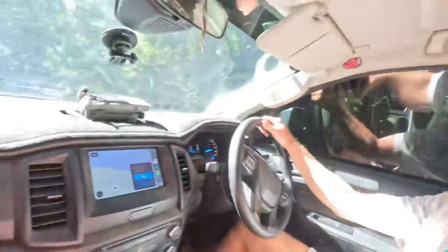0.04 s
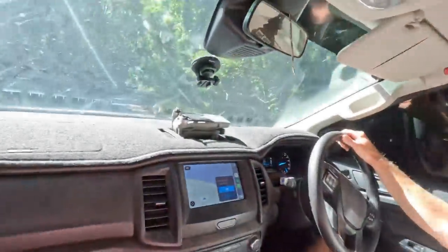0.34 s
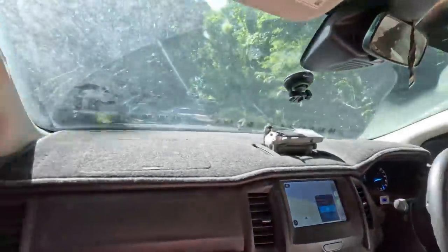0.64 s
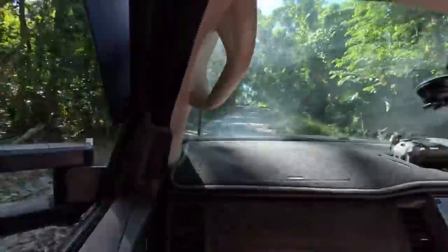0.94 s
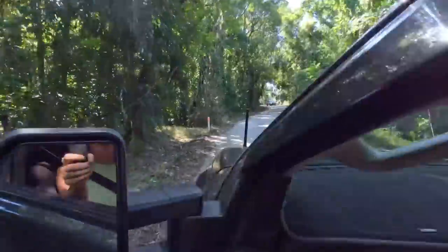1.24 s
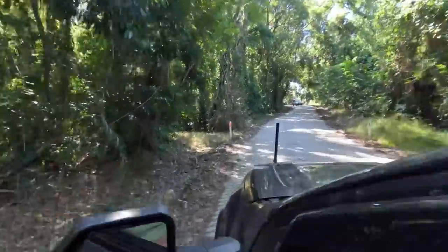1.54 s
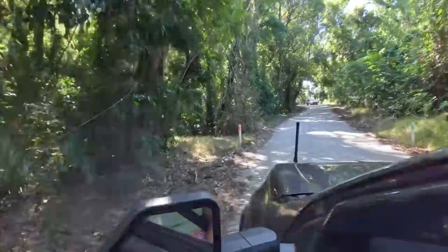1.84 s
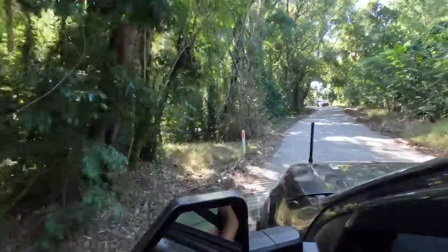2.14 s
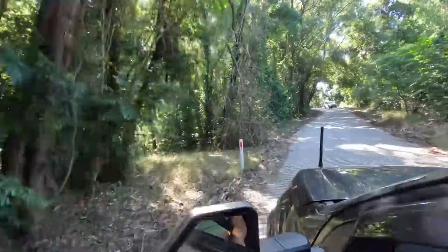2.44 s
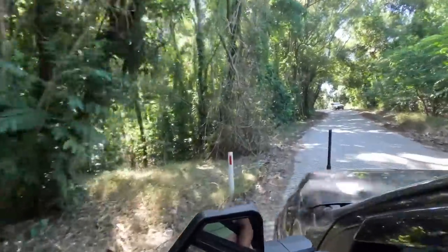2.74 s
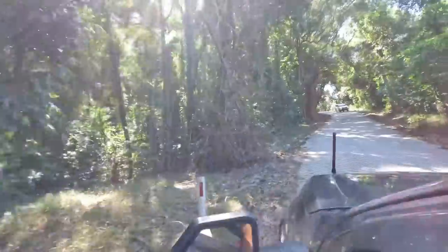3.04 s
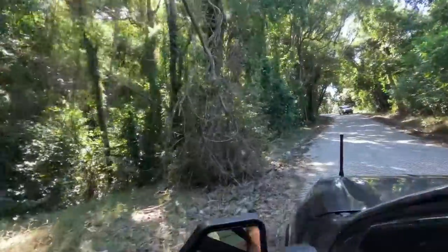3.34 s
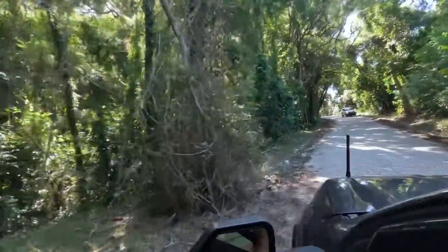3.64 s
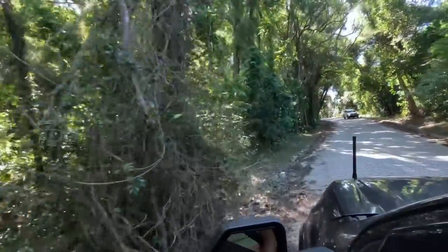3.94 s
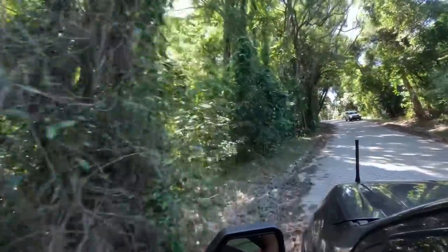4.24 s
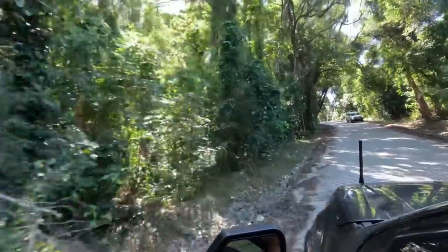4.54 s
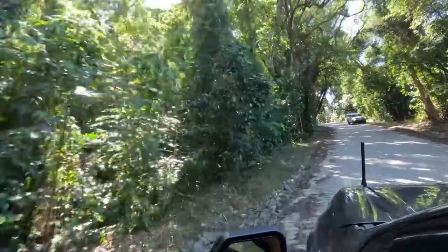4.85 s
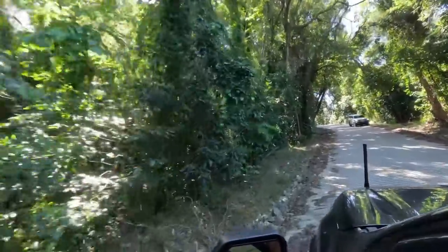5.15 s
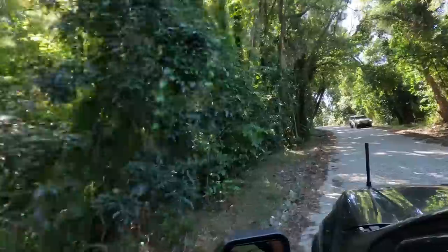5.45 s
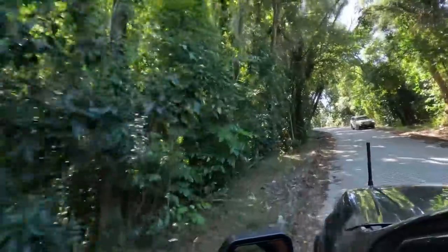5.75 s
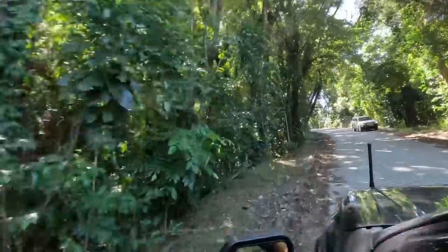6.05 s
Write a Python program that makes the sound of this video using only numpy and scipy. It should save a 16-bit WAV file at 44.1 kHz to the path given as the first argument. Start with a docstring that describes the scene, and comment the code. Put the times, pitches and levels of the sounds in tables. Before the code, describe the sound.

Wind batters a microphone held out of a moving vehicle's window. It starts briefly in the cabin, with a low engine drone and a deep pulsing of air, then the road noise rises and the wind hits. From there on, lumpy low gusts thump over a bright rush of air and tyres roaring on coarse tarmac, with the engine holding an even speed underneath.

```python
"""A four-wheel drive cruises along a forest road with a side window down.
First the cabin: the engine drones and the air booms, then throbs at the open window.
The road fades up, and after a second the microphone goes out through a burst of rushing air.
From there on wind buffets it, over the rush round mirror and pillar and the roar of the tyres,
which grows and takes on a hum near three seconds."""
import sys
import numpy as np
from scipy import signal
from scipy.fft import rfft, irfft
from scipy.io import wavfile
from scipy.ndimage import uniform_filter1d, minimum_filter1d

SR = 44100
rng = np.random.default_rng(int(sys.argv[2]) if len(sys.argv) > 2 else 0)


def generate_wav(sig):
    """Save sig (samples, or channels by samples) to the path in sys.argv[1] as 16-bit PCM at SR."""
    pcm = np.round(np.clip(np.atleast_2d(sig).T, -1, 1) * 32767).astype(np.int16)
    wavfile.write(sys.argv[1], SR, pcm)


N = 273861
TIME = np.arange(N) / SR
FREQS = np.maximum(np.fft.rfftfreq(N, 1 / SR), 1)
# the microphone's cues: it nears the window, meets the wind at the frame, is clear of the car
NEAR_WINDOW_S, AT_FRAME_S, CLEAR_S = 0.37, 0.88, 1.31


def from_db(db):
    """Decibels to gain."""
    return 10 ** (np.asarray(db) / 20)


def automation(rows):
    """One lane for each column after t/s, with a value at every sample."""
    times, *columns = np.transpose(rows)
    return [np.interp(TIME, times, column) for column in columns]


def ramp(start_s, end_s):
    """A straight fade from 0 to 1."""
    return np.clip((TIME - start_s) / (end_s - start_s), 0, 1)


def swell(at_s, spread_s):
    """A bell-shaped rise and fall of height 1."""
    return np.exp(-.5 * ((TIME - at_s) / spread_s) ** 2)


def shaped(gain):
    """Noise at unit rms, shaped by a gain at each frequency."""
    real, imaginary = rng.standard_normal((2, len(FREQS)))
    noise = irfft((real + 1j * imaginary) * gain, N)
    return noise / np.sqrt(np.mean(noise ** 2) + 1e-20)


def coloured(eq):
    """Unit noise through an EQ curve (f/Hz, level/dB) that falls steeply beyond its ends."""
    hz, db = np.transpose(eq)
    skirts = np.minimum(1, np.minimum(FREQS / hz[0], hz[-1] / FREQS)) ** 6
    return shaped(from_db(np.interp(np.log(FREQS), np.log(hz), db)) * skirts)


def drift(rate_hz):
    """A smooth random modulator at unit rms."""
    return shaped(1 / (1 + (FREQS / rate_hz) ** 2))


def levelled(noise, span_s):
    """Ride a noise to unit level over spans of this length."""
    size = int(span_s * SR)
    power = uniform_filter1d(uniform_filter1d(noise * noise, size), size)
    return noise / np.sqrt(power + 1e-9)


def resonance(hz, width_hz, level_db):
    """A resonance kept ringing by random forcing."""
    band = shaped(1 / (1 + ((FREQS - hz) / width_hz * 0.79) ** 2))
    return from_db(level_db) * levelled(band, span_s=0.39)


def thin_high_hiss(start_s=0.73, peak_s=1.36, end_s=1.41, level_db=-61, centre_hz=8800, width_hz=3900):
    """A faint, thin, bright hiss swells and then stops quickly."""
    envelope = np.interp(TIME, [start_s, peak_s, end_s], [0, 1, 0]) ** 1.4
    hiss = shaped(np.exp(-.5 * ((FREQS - centre_hz) / width_hz) ** 2))
    return from_db(level_db) * envelope * hiss


# rate of the engine cycle (two crank turns, five firings): t/s, f/Hz
ENGINE_SPEED = [(0, 20.06), (1.3, 20.12), (1.8, 19.72), (3, 19.54), (5, 19.15), (6.21, 19.5)]
# partials of the drone: multiple of the cycle rate, cabin level/dB, outside level/dB
ENGINE_ORDERS = [(4, -35.5, -32.5), (5, -33, -36), (9, -39.5, -47), (10, -37, -33.5), (11, -42.5, -45),
                 (12, -45.5, -45), (14, -42.5, -48.5), (15, -45.5, -37.5), (17, -47.5, -40),
                 (20, -56, -40.5), (22, -52, -45.5), (27, -52.5, -39.5), (39, -55, -43.5), (42, -55, -44.5),
                 (55, -73, -49.5)]
# partials of the drive's faint whine: multiple of the cycle rate, level/dB with the fader at 0
WHINE_ORDERS = [(64, -44.5), (80, -44)]
# fader ride on the whine: t/s, level/dB
WHINE_FADER = [(.7, -29), (1.25, -5), (1.8, -10), (2.4, 1.5), (3.1, -10), (3.6, -3), (6.21, -18)]


def engine(inside, wobble=0.00292, waver_inside=0.23, waver_outside=0.29, waver_whine=0.54):
    """No two firings are alike, so each partial wavers; the cabin muffles the drone's high ones."""
    cycle_hz, = automation(ENGINE_SPEED)
    whine_db, = automation(WHINE_FADER)
    phase = 2 * np.pi * np.cumsum(cycle_hz * (1 + wobble * drift(rate_hz=3.15))) / SR
    waver_drone = inside * waver_inside + (1 - inside) * waver_outside

    def partial(order, waver):
        """One wavering harmonic of the cycle at about unit rms."""
        level = 1 + waver * drift(rate_hz=5.0)
        return level * np.sqrt(2) * np.sin(order * phase + rng.uniform(0, 2 * np.pi))

    drone = 0
    for order, inside_db, outside_db in ENGINE_ORDERS:
        gain = inside * from_db(inside_db) + (1 - inside) * from_db(outside_db)
        drone += gain * partial(order, waver_drone)
    whine = sum(from_db(db + whine_db) * partial(order, waver_whine) for order, db in WHINE_ORDERS)
    return drone + whine


# EQ of the cabin bed: f/Hz, level/dB
CABIN_EQ = [(55, 2.5), (130, -2.5), (250, -5.5), (310, -9), (400, -14.5), (600, -19.5), (770, -17),
            (850, -23), (910, -25.5), (1200, -25.5), (1800, -32.5), (2150, -33.5), (2450, -33.5),
            (2750, -39), (3300, -36), (3600, -41.5), (4000, -44), (6000, -47.5), (8000, -50.5), (8800, -58),
            (9600, -54.5), (11000, -64.5), (12900, -63), (14000, -70)]


def cabin_bed(level_db=-29.5):
    """Muffled road rumble and air leaking into the cabin."""
    return from_db(level_db) * coloured(CABIN_EQ)


def cabin_boom(boom_hz=37.6, sag_hz_per_s=1.39, fade_db_per_s=71, throb_hz=29.02):
    """The cabin air booms, throbs against the open window as it dies, and swells once more."""
    def held(level_db, until_s):
        """Hold a level, then die away."""
        return from_db(level_db - fade_db_per_s * np.maximum(TIME - until_s, 0))

    phase = 2 * np.pi * np.cumsum(boom_hz - sag_hz_per_s * TIME) / SR
    last_swell = from_db(-19) * swell(at_s=1.2, spread_s=0.11)
    boom = (held(-16.5, until_s=0.51) + last_swell) * np.sin(phase)
    sub_octave = held(-20.5, until_s=1) * np.sin(phase / 2)   # every other beat is stronger
    throb = from_db(-15.5) * swell(at_s=0.71, spread_s=0.11) * np.sin(2 * np.pi * throb_hz * TIME)
    return np.sqrt(2) * (boom + sub_octave + throb)


def body_boom():
    """The car's body booms, a sub layer heard outside."""
    return resonance(hz=32, width_hz=8.7, level_db=-33)


# fader rides on the air past mirror and pillar: t/s, rush level/dB, hiss level/dB
AIRFLOW_FADERS = [(1.66, -38.5, -50), (1.95, -36, -49), (2.1, -35.5, -45.5), (2.22, -34, -46.5),
                  (2.45, -32, -44), (2.62, -34, -45.5), (2.7, -35.5, -44.5), (3.0, -34.5, -44.5),
                  (3.25, -33, -44), (3.7, -34, -48), (4.1, -36, -48), (4.3, -35, -47), (4.58, -36, -46),
                  (4.66, -33.5, -45), (4.8, -35, -46), (5.25, -34.5, -46.7), (5.7, -33.5, -44.5),
                  (6.21, -33, -45)]
# EQs of the rush and of the fine hiss above it: f/Hz, level/dB
RUSH_EQ = [(900, -13), (1400, -2), (1900, 0.5), (2400, -1), (2850, -3), (3300, -2), (3600, -9.5),
           (4200, -17.5), (5000, -41)]
HISS_EQ = [(3000, -2), (3750, 1), (4400, -1.5), (5600, -5.5), (6900, -12), (8200, -14.5), (9000, -20.5),
           (10000, -20), (11500, -28), (12300, -33), (14500, -44)]


def slipstream(flutter_db=0.91, flutter_hz=22, shear_hiss_db=-18):
    """Air tears past mirror and pillar, hardest in the shear layer; rush and hiss flutter together."""
    rush_db, hiss_db = automation(AIRFLOW_FADERS)
    shear = from_db(-33) * swell(at_s=1.422, spread_s=0.077)   # fast air by the window, crossed once
    rush_gain = np.hypot(from_db(rush_db), shear)
    hiss_gain = np.hypot(from_db(hiss_db), shear * from_db(shear_hiss_db))
    rush = coloured(RUSH_EQ)
    whistle = resonance(hz=3270, width_hz=170, level_db=-12.8)
    air = rush_gain * (rush + whistle) + hiss_gain * opening_shelf(coloured(HISS_EQ))
    return air * from_db(flutter_db * drift(flutter_hz))


def opening_shelf(hiss, above_hz=7500, start_db=-5, rise_db_per_s=1.17):
    """A high shelf steadily brightens the hiss."""
    top = irfft(rfft(hiss) / (1 + (above_hz / FREQS) ** 6), N)
    return hiss + (from_db(start_db + rise_db_per_s * TIME) - 1) * top


# EQ of the tyre roar: f/Hz, level/dB
TYRE_EQ = [(250, -27), (500, -2), (700, 2), (810, -6), (900, -4), (1080, -2.5), (1380, -9), (1600, -7.5),
           (2000, -20.5), (3000, -37)]
# narrow bands humming in it: f/Hz, width/Hz, level/dB against the roar
TYRE_HUM = [(314, 83, -11.5), (804, 10, -10.5), (839, 12, -14), (1073, 10.5, -12), (1227, 31, -15),
            (1600, 20, -21.5)]


def tyres(swirl, settled_db=-26.5, beside_door_db=-10.5, settle_s=1.31, flutter_db=0.5):
    """Tread roars on coarse tarmac, fluttering in the air; it grows and hums as the microphone reaches out."""
    level_db = settled_db + beside_door_db * np.exp(-np.maximum(TIME - CLEAR_S, 0) / settle_s)
    roar = from_db(flutter_db * swirl) * coloured(TYRE_EQ)
    hum = ramp(start_s=2.7, end_s=3.0) * sum(resonance(*band) for band in TYRE_HUM)
    late_drone = resonance(hz=347, width_hz=170, level_db=-23) * swell(at_s=5.82, spread_s=0.27)
    return from_db(level_db) * (roar + hum) + late_drone


# fader ride on the wind, steady but for a few lulls: t/s, level/dB
WIND_FADER = [(1.25, -23.5), (1.32, -20), (1.45, -18.5), (1.7, -22), (1.98, -20), (2.07, -22.5),
              (2.2, -18.5), (2.95, -20), (3.1, -23.5), (3.42, -20), (3.58, -20.5), (3.64, -18.5),
              (4.15, -20), (4.6, -17.5), (5.3, -20), (5.55, -21.5), (5.8, -21), (6.0, -19)]
# EQ of its rumble: f/Hz, level/dB
WIND_EQ = [(18, 5), (45, 7.5), (62, 3.5), (80, -2), (115, -0.5), (200, -4.5), (310, -3), (480, -9.5),
           (750, -17), (1100, -24)]


def wind(swirl, flutter_db=1.1):
    """Turbulence presses on the microphone port: a deep, lumpy rumble."""
    level_db, = automation(WIND_FADER)
    return from_db(level_db + flutter_db * swirl) * levelled(coloured(WIND_EQ), span_s=0.079)


# cue list of the big gusts: t/s, thump level/dB, roar level/dB, push level/dB, spread/s
GUST_CUES = [(1.329, -15.5, -30, -30, 0.016), (1.38, -14.5, -29, -22, 0.014), (1.579, -21, -43, -26, 0.014),
             (1.693, -18, -42, -30, 0.02), (1.738, -33, -26, -30, 0.016), (1.784, -14, -30, -27, 0.012),
             (1.834, -19.5, -26, -30, 0.016), (1.911, -16, -38, -22, 0.0054),
             (1.944, -16, -37, -30, 0.0079), (1.989, -16.5, -45, -23, 0.013), (2.028, -23, -27, -32, 0.006),
             (2.22, -20, -33, -28, 0.028), (2.306, -16.5, -30, -32, 0.014),
             (2.377, -21.5, -27.5, -29, 0.035), (2.574, -19.5, -24.5, -32, 0.01),
             (2.632, -20, -32, -26, 0.013), (2.803, -18, -33, -12, 0.012), (2.986, -14, -42, -32, 0.015),
             (3.378, -19.5, -35, -28, 0.017), (3.438, -22, -33, -26, 0.013),
             (3.525, -8.5, -26, -2.9, 0.0075), (3.92, -13, -31, -12, 0.014),
             (3.976, -14.5, -30, -11.5, 0.01), (4.021, -20, -35, -24, 0.0088),
             (4.064, -15.5, -38, -26, 0.024), (4.397, -18, -44, -13, 0.015), (4.444, -24, -38, -26, 0.012),
             (5.257, -13, -32, -17, 0.0085)]
# EQs of a gust's low thump and mid-range roar: f/Hz, level/dB
THUMP_EQ = [(30, 1), (80, 4.5), (250, 0), (450, -6.5), (900, -24.5), (1800, -32)]
ROAR_EQ = [(450, -3), (750, 6.5), (1150, -2.5), (1700, -14)]


def gusts(push_lag_s=0.019):
    """Each large gust thumps and roars, then its slow pressure shoves the diaphragm."""
    thump_gain = roar_gain = push = 0
    for at_s, thump_db, roar_db, push_db, spread_s in GUST_CUES:
        hit = swell(at_s, spread_s)
        thump_gain += from_db(thump_db) * hit
        roar_gain += from_db(roar_db) * hit
        push += from_db(push_db) * swell(at_s + push_lag_s, spread_s)
    thumps = thump_gain * levelled(coloured(THUMP_EQ), span_s=0.012)
    return thumps + roar_gain * coloured(ROAR_EQ) + push


def scene(tyre_shield_db=-6.5, air_shield_db=-15.5):
    """The mix follows the microphone: the road fades up, the wind hits, the cabin fades out."""
    at_window = ramp(NEAR_WINDOW_S, AT_FRAME_S)
    in_wind = ramp(AT_FRAME_S, CLEAR_S)
    in_cabin = 1 - ramp(start_s=1.5, end_s=2.1)
    shielded = 1 - in_wind   # the car's body screens off tyres and slipstream
    swirl = drift(rate_hz=35)   # one flutter shared by tyres and wind
    road = from_db(tyre_shield_db * shielded) * tyres(swirl)
    air = from_db(air_shield_db * shielded) * slipstream()
    exposed = wind(swirl) + gusts() + body_boom()
    drone = engine(inside=1 - in_wind ** 3)
    cabin = in_cabin * (cabin_bed() + cabin_boom())
    mix = thin_high_hiss() + drone + cabin + at_window * (road + air) + in_wind ** 1.2 * exposed
    return mix[None]


def record(dry, threshold_db=-6.6, release_db_per_s=80, low_cut_hz=14, high_cut_hz=16200):
    """A limiter ducks everything under the strongest buffets; the slow pressure and the top are cut."""
    over_db = np.maximum(20 * np.log10(np.abs(dry[0]) + 1e-9) - threshold_db, 0)
    release_db = release_db_per_s * TIME
    duck_db = np.maximum.accumulate(over_db + release_db) - release_db
    gain = uniform_filter1d(minimum_filter1d(from_db(-duck_db), size=129), size=129)   # soft look-ahead
    low_cut = signal.butter(2, low_cut_hz, "high", fs=SR, output="sos")
    high_cut = signal.cheby2(16, 60, high_cut_hz, fs=SR, output="sos")
    return signal.sosfilt(high_cut, signal.sosfilt(low_cut, dry * gain))


dry = scene()
out = record(dry)
generate_wav(out)
```